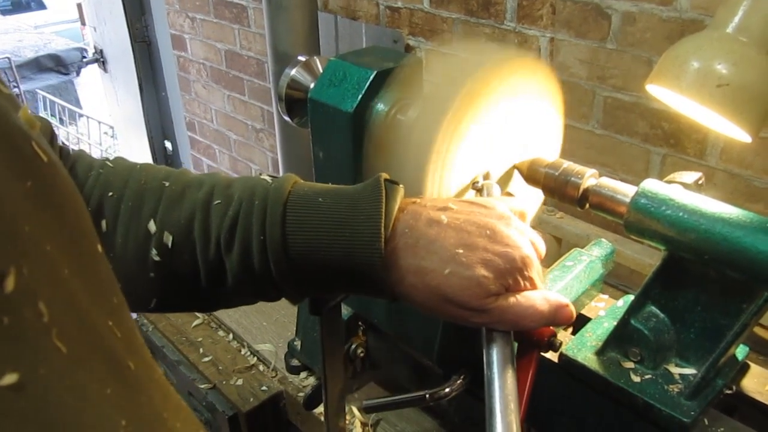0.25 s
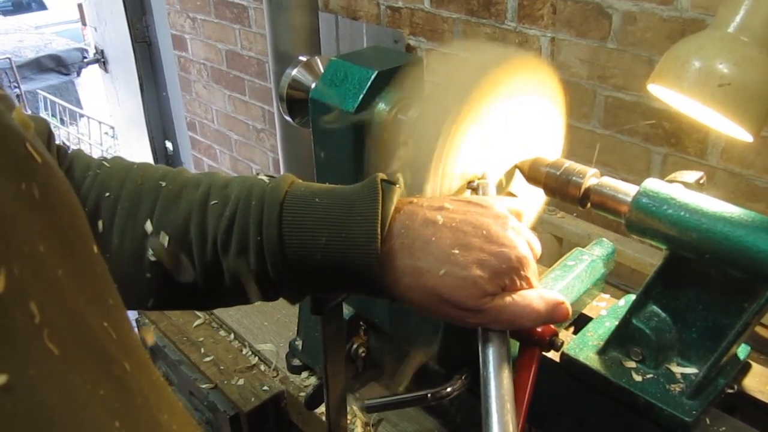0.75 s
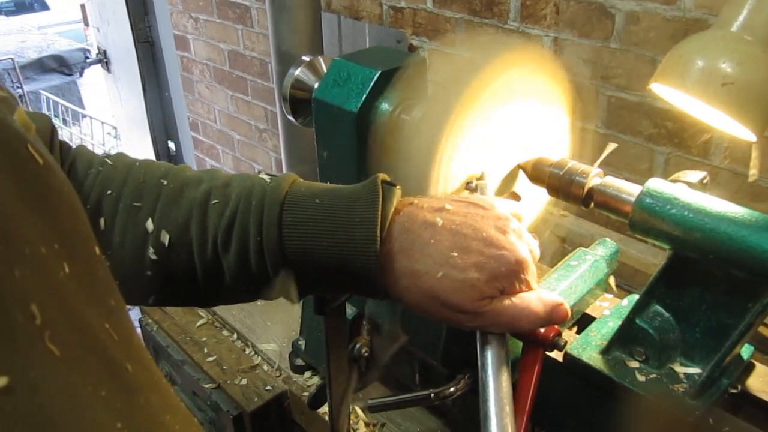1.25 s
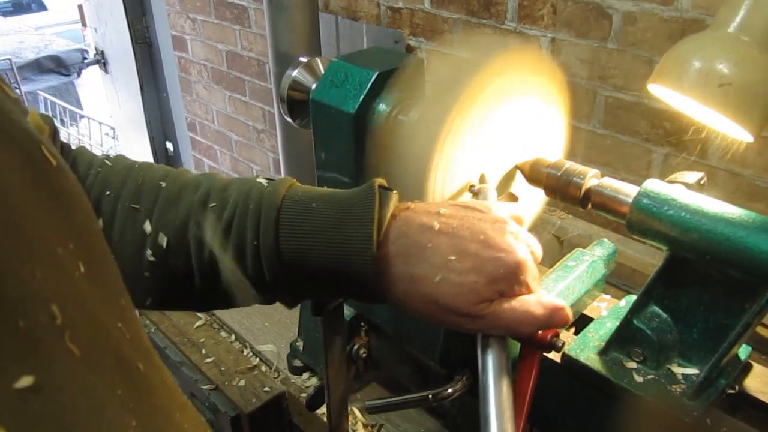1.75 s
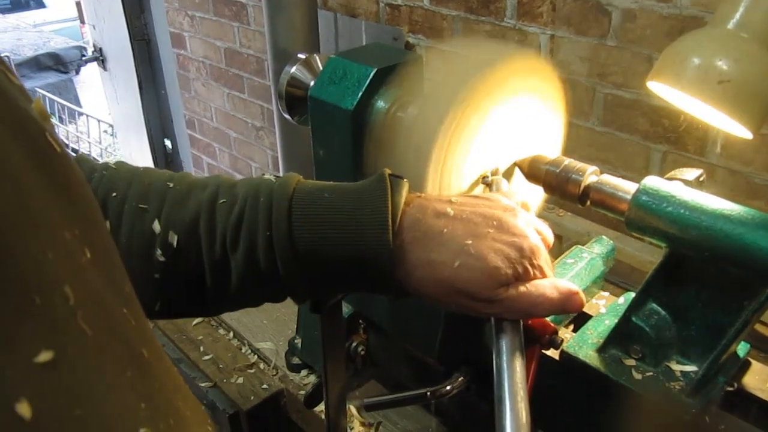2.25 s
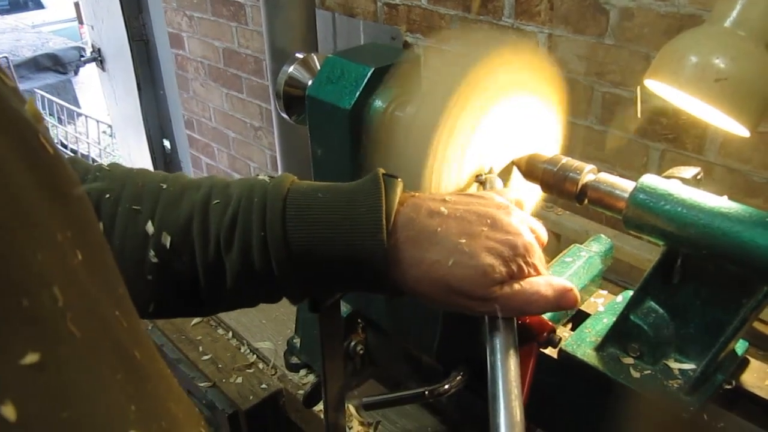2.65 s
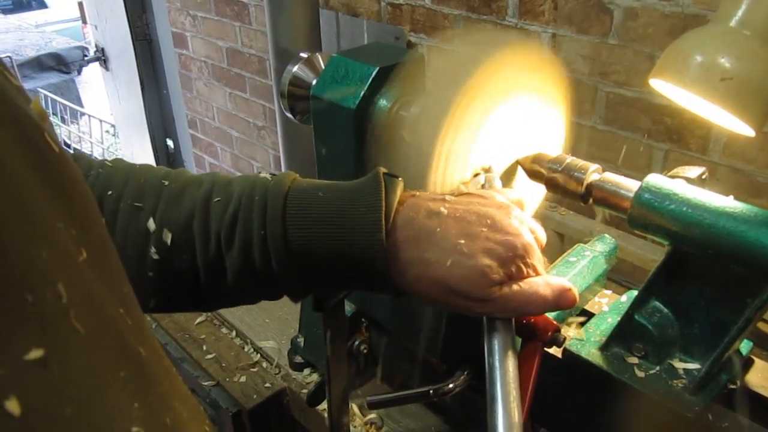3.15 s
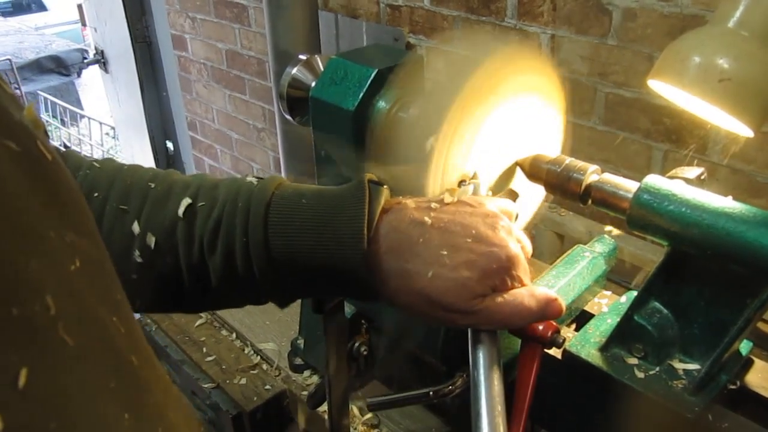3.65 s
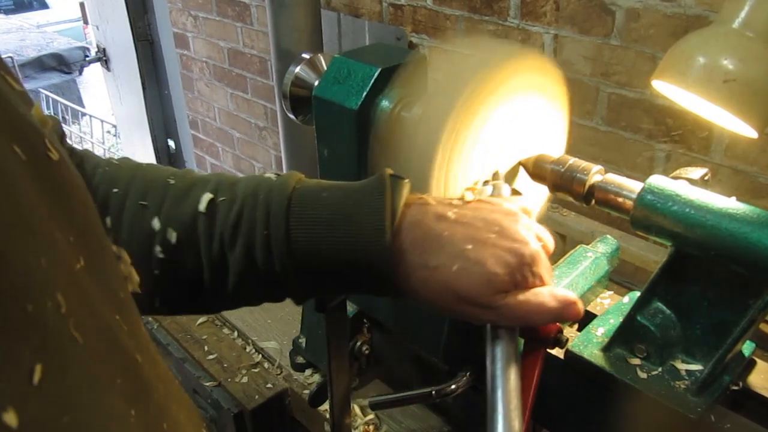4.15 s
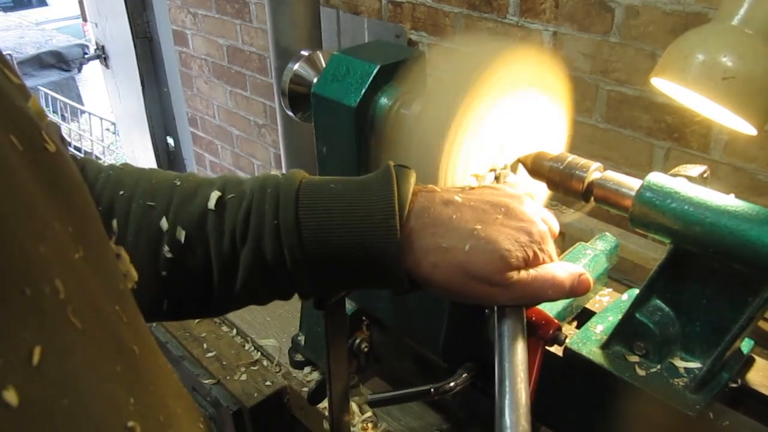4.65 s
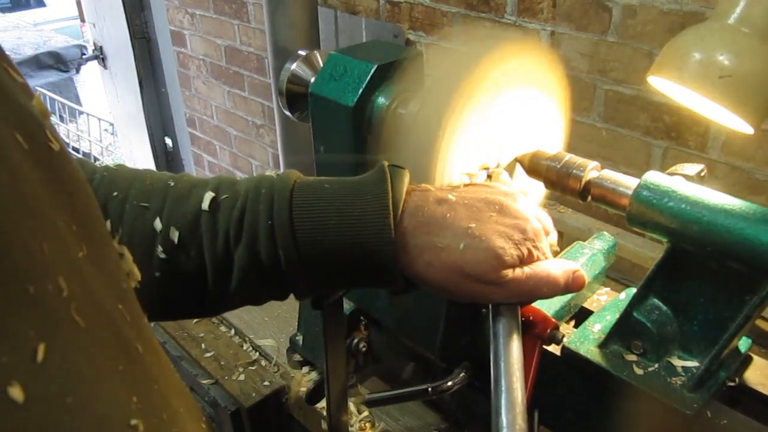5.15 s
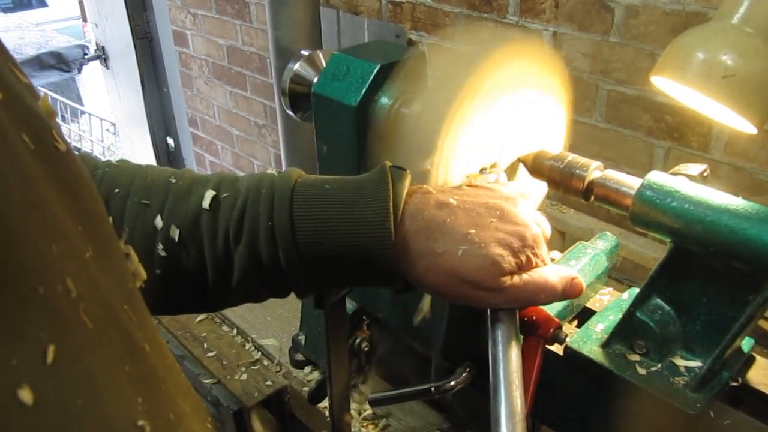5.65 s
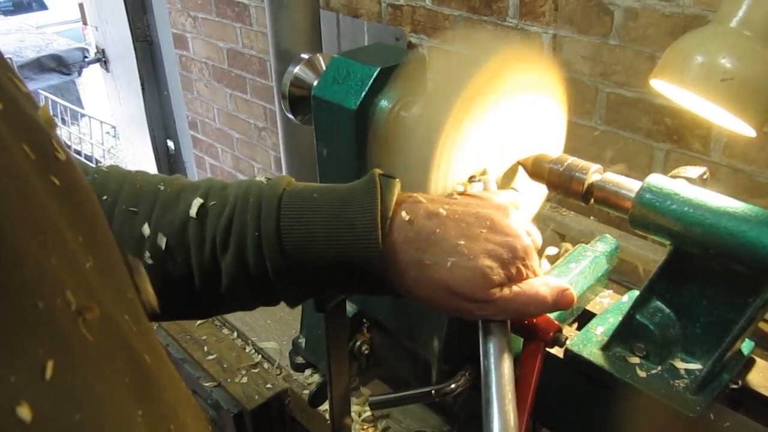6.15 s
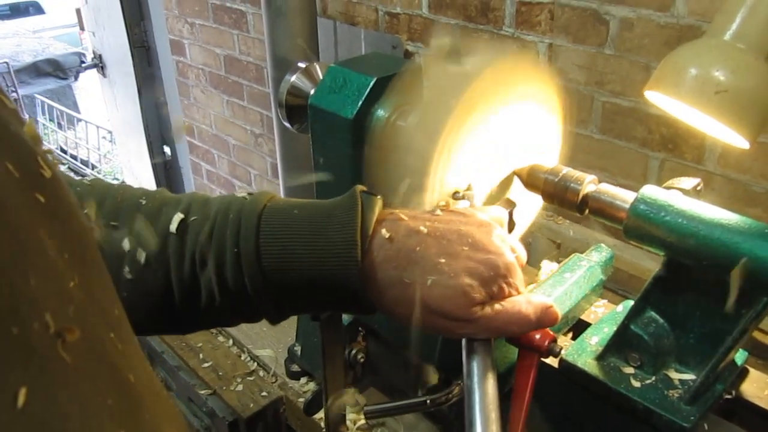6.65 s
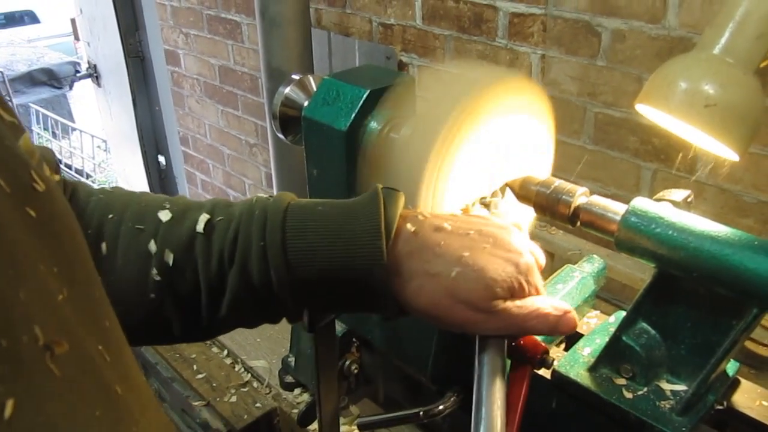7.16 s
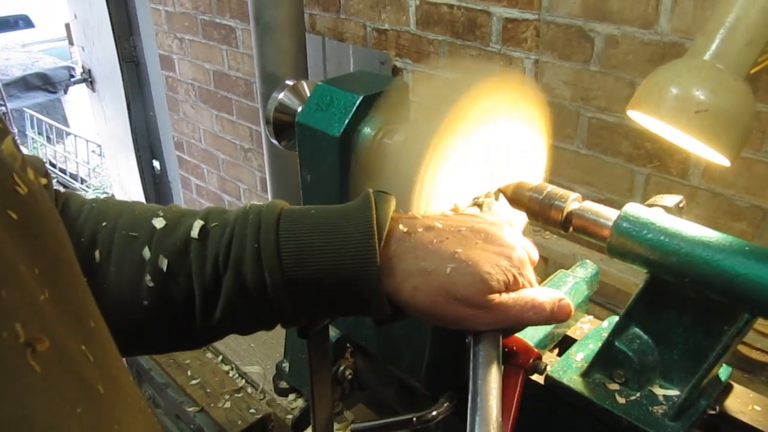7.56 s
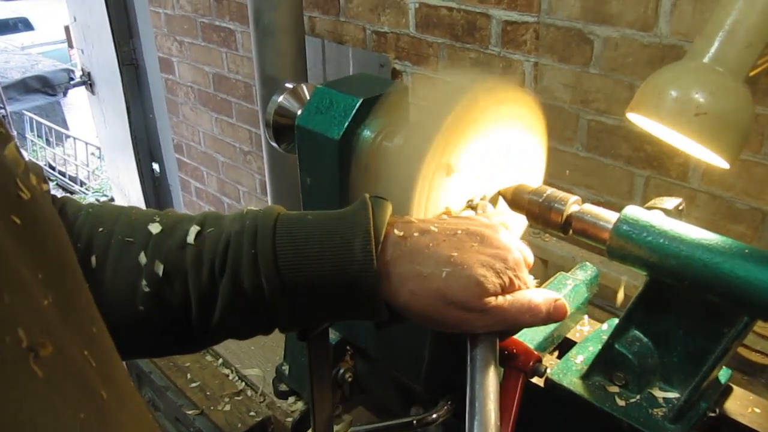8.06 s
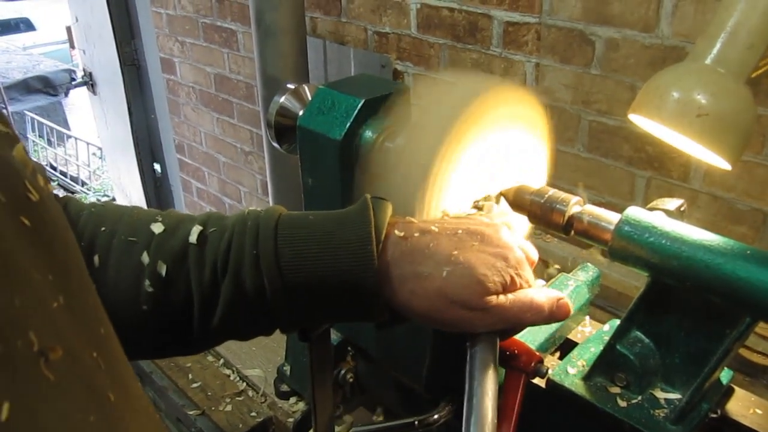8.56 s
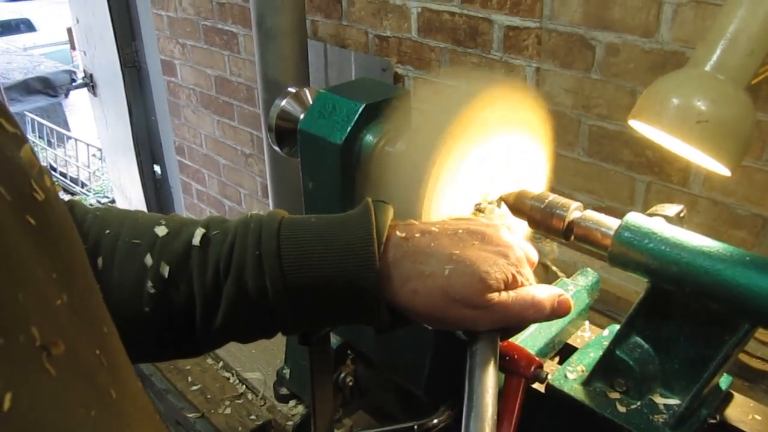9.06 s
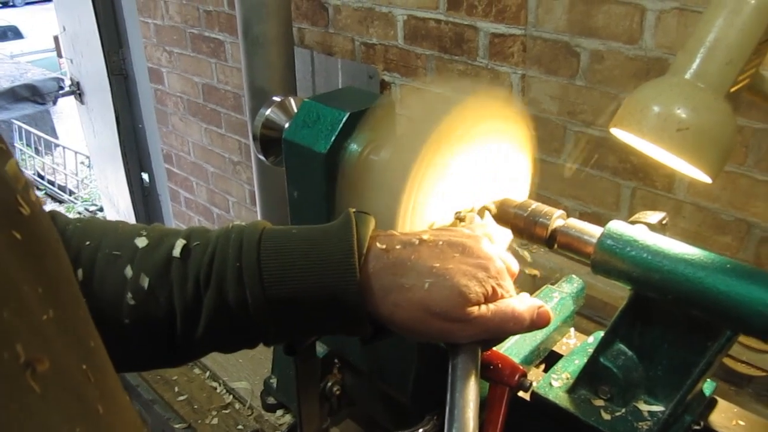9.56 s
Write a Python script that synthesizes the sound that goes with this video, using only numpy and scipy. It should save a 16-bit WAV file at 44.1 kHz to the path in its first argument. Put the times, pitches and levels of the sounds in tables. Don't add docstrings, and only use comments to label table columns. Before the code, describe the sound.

In a small brick workshop, a lathe motor hums low with a thin, pulsing belt hiss. A steel gouge bites a spinning wet bowl blank in bright, tearing hisses that flutter about thirty times a second. Five cuts come with short pauses, each starting with ticking touches and swelling to full rasp. A small nearby camera microphone gives a close, slightly dull-topped sound with short room echo.

```python
import sys
import numpy as np
from scipy import signal
from scipy.fft import rfft, irfft, next_fast_len
from scipy.io import wavfile
from scipy.ndimage import uniform_filter1d, map_coordinates

SR = 44100
rng = np.random.default_rng(int(sys.argv[2]) if len(sys.argv) > 2 else 0)


def undo_db(level):
    steps = np.asarray(level, float) / 20
    return 10 ** steps


def inscribe(sig):
    pcm = np.round(np.clip(np.atleast_2d(sig).T, -1, 1) * 32767)
    wavfile.write(sys.argv[1], SR, pcm.astype(np.int16))


N = 432180
TIME = np.arange(N) / SR
TURNS_A_SECOND = 16.2

# t/s, motor level/dB, belt level/dB
MACHINE = [
    (0, -37.5, -43),
    (1.8, -43, -44.5),
    (2.2, -41, -43.5),
    (4, -40.5, -41),
    (4.5, -38.5, -41),
    (7, -40.5, -41.5),
    (7.5, -38, -39),
    (8.5, -36, -38),
    (9.8, -35.5, -35),
]
# t/s, laps run
BELT_LAPS = [(-.06, -9), (1.81, 0), (2.02, 1), (4.09, 11), (4.5, 13), (7.015, 25), (7.425, 27), (8.455, 32),
             (8.87, 34), (9.91, 39)]
# f/Hz, width/Hz, level/dB
CASING_MODES = [(207.1, 3.3, 5), (428, 2, -5), (663.3, 15.6, -2), (907.7, 11.5, 3.5), (1400, 186, -9.5),
                (2290, 23, -1.5)]
PULLEY_MODES = [(5720, 140, -4), (6150, 100, 2), (7210, 180, 1.5), (9100, 84, -12), (9260, 400, 0.5),
                (10000, 130, 3.5)]
# f/Hz, level/dB (per Hz)
MOTOR_SPECTRUM = [(15, -7), (32, -4), (75, -29), (102, -7.5), (150, -12.5), (400, -10), (950, -8.5),
                  (1180, -18), (2000, -10.5), (3700, -18), (6000, -20.5), (15000, -32.5)]
BELT_AIR_SPECTRUM = [(3000, -31.5), (5000, -8.5), (6800, -5), (7200, 4), (10300, -2.5), (12500, -7),
                     (14000, -10), (16000, -30)]

# t/s, lead over an even spin/turns
SPIN_LEAD = [(.1, .75), (.53, .76), (.97, .705), (1.4, .64), (1.62, .56), (2.2, .97), (2.76, .965),
             (3.05, .9), (3.63, .945), (3.85, .89), (5.2, 1.36), (6.08, 1.46), (6.56, 1.4), (6.8, 1.27),
             (7.75, 1.75), (8.35, 1.806), (8.95, 2.175), (9.75, 2.29)]
# t/s, worst out-of-round level/dB, end grain level once deep/dB, shank ring once deep/dB
ENTRIES = [
    (-.05, 4, 5, 1),
    (2.1, 4, 5, -2),
    (4.62, 4.5, 4.5, -3),
    (7.55, 4.5, 5, 3),
    (8.699, 5, 6, 1),
]
# t/s, peak level/dB
CATCHES = [(0.103, 11), (0.2635, -5), (0.324, -1), (0.382, 3.5), (0.506, -3), (0.691, 0), (0.817, 0),
           (0.847, 2), (0.9428, -1), (1.128, 5), (1.2532, 0), (1.378, 1), (1.441, -3.5), (1.505, -2),
           (1.5688, -9), (2.6557, -5), (3.093, -2), (3.1507, -8), (3.3358, -7), (3.642, 6), (3.674, 2.5),
           (3.837, -1.5), (4.9154, 2), (5.282, 1), (6.58, -2), (6.7072, 5), (7.7964, 1), (8.0373, -3),
           (9.6395, -11), (9.7607, 2),
           (0.1431, 0), (0.166, -7), (1.601, -1), (1.886, -8), (2.066, -5), (2.1253, -1), (2.184, -14),
           (2.246, -8), (2.31, -7), (2.372, -8), (4.0657, -17), (4.5694, -13), (4.6294, -23), (4.6924, -4),
           (7.564, -7), (8.2806, 0), (8.3414, -28), (8.6018, -4), (8.902, -6), (8.9694, -12), (9.335, -1),
           (9.6719, -5)]

# t/s, pressure level/dB, shear (0 scraping, 1 slicing), reach (0 low, 1 high on the wall)
FIRST_CUT = [
    (0, -32.5, 0.9, 0.2),
    (.07, -26, 0.55, 0.36),
    (.3, -24, 0.65, 0.14),
    (.5, -21.5, 0.63, 0.68),
    (.82, -22, 0.73, 0.28),
    (.92, -27.5, .9, 0.85),
    (1.1, -24, 0.8, 0.48),
    (1.35, -26.5, 1, 0.92),
    (1.63, -23.5, 0.63, 0.8),
]
BRUSH = [
    (1.71, -48, 0.81, .1),
    (1.82, -57, .7, .5),
    (1.89, -30, 0.48, .3),
    (1.96, -54, 1, .3),
]
SECOND_CUT = [
    (2.1, -36, 0.43, .5),
    (2.2, -39.5, 0.69, 0.51),
    (2.5, -25.5, 0.42, .3),
    (2.7, -22.5, 0.47, 0),
    (2.95, -21, 0.43, 0),
    (3.1, -24, 0.51, 0.52),
    (3.3, -24.5, 0.57, 0.63),
    (3.5, -23, 0.54, 0.73),
    (3.59, -26.5, 0.6, 0.75),
]
RETAKE = [
    (3.62, -42, 1, .4),
    (3.65, -20.5, 0.71, 0.45),
    (3.75, -23.5, 0.58, 0.66),
    (3.86, -25.5, 0.94, 0.67),
    (3.92, -35, 0.48, 0.38),
    (4.05, -49, .7, .5),
    (4.45, -46, 1, .3),
]
THIRD_CUT = [
    (4.6, -35, .6, 0.24),
    (4.9, -22, 0.29, 0.35),
    (5.0, -26.5, 0.54, 0.15),
    (5.18, -21, 0.17, 0.27),
    (5.25, -29, 0.52, 0),
    (5.3, -21, 0.14, .1),
    (5.42, -25, 0.46, 0.53),
    (5.9, -22.5, 0.42, 0.34),
    (6.05, -22, 0.56, 0.74),
             (6.4, -22, 0.5, 0.66),
    (6.6, -21.5, 0.66, 0.76),
    (6.81, -23, 0.69, 0.59),
    (6.88, -39.5, .9, .3),
    (7.0, -50, 0.8, .6),
]
FOURTH_CUT = [
    (7.4, -50, 0.63, .6),
    (7.6, -37, .1, 0.5),
    (7.75, -29.5, 0.13, 0.12),
    (8.0, -23.5, .1, 0.48),
    (8.15, -30.5, 0.23, 0.57),
    (8.36, -24.5, 0.16, 0.35),
    (8.42, -45, .5, .5),
    (8.6, -40, 0.41, .4),
    (8.8, -39.5, 0.47, .9),
]
FIFTH_CUT = [
    (8.9, -30.5, 0.17, 0.22),
    (9.1, -24, 0.27, .6),
    (9.3, -26, 0.16, 0.22),
    (9.5, -27.5, 0.31, 0.28),
    (9.6, -24, 0.042, .3),
    (9.8, -27.5, .05, .2),
]
# t/s, bed level/dB
REST_WEIGHT = [(0.0, -52), (0.02, -46.5), (1.09, -39.5), (1.63, -44), (1.72, -54), (2.7, -40),
               (3.66, -51.5), (3.68, -42.5), (4.39, -57.5), (4.75, -39), (5.92, -48), (6.61, -43),
               (6.88, -54), (7.91, -40), (8.49, -47.5), (9.06, -37), (9.36, -46), (9.8, -39.5)]

# f/Hz, width/Hz, level/dB
TIP_SCRAPING = [(1960, 220, -4), (2890, 380, 1.5), (2917, 150, 2.5), (3030, 360, 6)]
TIP_SLICING = [(1880, 360, -12), (2960, 250, 5.5), (3226, 190, -1), (3750, 220, 2)]
SHANK_SCRAPING = [(4745, 50, 2), (4885, 80, -5), (5430, 120, -16)]
SHANK_SLICING = [(4760, 180, 5), (4940, 240, -7), (4100, 1050, -11)]
SHAVING_SCRAPING = [(3660, 390, -8), (6480, 300, 3), (8200, 230, -25), (9330, 270, -8), (10880, 120, -1.5),
                    (11750, 190, -7), (14600, 2200, -19)]
SHAVING_SLICING = [(3680, 300, -7), (6600, 280, -3), (7120, 150, -8), (7860, 300, -6), (9200, 220, 0),
                   (9500, 220, 0), (10750, 140, -2), (11850, 220, -8), (13100, 130, -11)]
WALL_MODES = [(2065, 210, 0)]
BED_MODES = [(196, 28, 3), (258, 30, -4), (316, 28, .5)]
# f/Hz, level/dB (per Hz)
TEARING_SPECTRUM = [(300, -42), (1000, -9.5), (1700, -23), (2600, -25), (4300, -0.5), (6000, -27)]
SHAVING_SPECTRUM = [(4500, -23.5), (6000, -9), (10300, -2), (11300, -15), (13300, -9), (16000, -32)]
TIP_DB, SHAVING_DB, SHANK_DB, BED_DB = (1.5, -14.5), (-4, 1), (-4, -6), (2, -2.5)
WALL_DB = (-26.5, -4)

# f/Hz, t60/s
SHOP_DECAY = [(200, 0.063), (2000, 0.21), (10000, 0.061)]
# f/Hz, level/dB
TREBLE_FALL = [(11000, 0.5), (13100, -6), (13800, -14), (15700, -15)]
THINNED = [.055, .566, .779, 1.12, 1.631, 1.952, 2.527, 2.68, 2.699, 2.846, 2.91, 3.573, 3.743, 3.812,
           4.001, 4.407, 4.962, 5.043, 5.195, 5.259, 6.303, 6.497, 6.86, 7.242, 7.477, 8.458, 8.565, 8.67,
           8.8, 8.908]
THINNED_TWICE = [2.69, 2.7]


def unit(x):
    return x / np.sqrt(np.mean(x ** 2) + 1e-20)


def along(points, hz):
    f, v = np.transpose(points)
    return np.interp(np.log(hz + 1), np.log(f + 1), v)


def curves(rows):
    s, *columns = np.transpose(rows)
    return [np.interp(TIME, s, column) for column in columns]


def between(ends, share):
    return ends[0] + (ends[1] - ends[0]) * share


def wobble(rate):
    return map_coordinates(rng.standard_normal(int(N * rate / SR) + 4), [TIME * rate])


def through(x, modes, spectrum=None, low_hz=20):
    m = next_fast_len(N + SR // 2)
    f = np.fft.rfftfreq(m, 1 / SR)
    ring = sum(undo_db(db) * 1j * f * w / (c * c - f * f + 1j * f * w) for c, w, db in modes)
    broad = undo_db(along(spectrum, f)) if spectrum else 0
    high_pass = (f / (f - 1j * low_hz)) ** 2
    return unit(irfft(rfft(x, m) * (ring + broad) * high_pass, m)[:N])


def fibres(spiky_db):
    return rng.standard_normal(N) * undo_db(spiky_db * wobble(900))


def patchy(x, depth_db):
    z = signal.stft(x, nperseg=256)[2]
    field = uniform_filter1d(rng.standard_normal(z.shape), size=4, axis=0)
    field = uniform_filter1d(field, size=5, axis=1)
    return signal.istft(z * undo_db(depth_db * unit(field)), nperseg=256)[1][:N]


def motor():
    level_db = curves(MACHINE)[0] + 0.27 * wobble(5.0)
    hum = through(rng.standard_normal(N), CASING_MODES, MOTOR_SPECTRUM) * undo_db(level_db)
    return patchy(hum, depth_db=1.0)


def belt():
    lap = curves(BELT_LAPS)[0] % 1
    joint = np.exp(-np.minimum(lap / .04, (1 - lap) / .1) ** 2)
    half_way = np.exp(-((lap - .52) / .05) ** 2)
    level_db = curves(MACHINE)[1] + 3.5 - 11 * joint - 4 * half_way + wobble(30)
    hiss = through(fibres(spiky_db=0.0), PULLEY_MODES, BELT_AIR_SPECTRUM) * undo_db(level_db)
    return patchy(hiss, depth_db=3.5)


def blank():
    truing_s, deepen_s = 0.22, 0.27
    s, round_db, grain_db, ring_db = np.transpose(ENTRIES)
    last = np.searchsorted(s, TIME) - 1
    age = TIME - s[last]
    high_side = age / truing_s * np.exp(1 - age / truing_s)
    deep = 1 - np.exp(-age / deepen_s)
    return round_db[last] * high_side, grain_db[last] * deep, ring_db[last] * deep


def jolts(press_db):
    s, peak_db = np.transpose(CATCHES)
    at = np.round((s + 0.0032) * SR).astype(int)
    impulses = np.zeros(N)
    impulses[at] = undo_db(peak_db - 8.5 - press_db[at]) ** 2
    t = np.linspace(-.02, .02, 1765)
    return np.abs(signal.fftconvolve(impulses, np.exp(-np.abs(t) / .0022), "same"))


def grain_load(press_db):
    round_db, grain_db, _ = blank()
    turns = TURNS_A_SECOND * TIME + curves(SPIN_LEAD)[0]
    angle = 2 * np.pi * turns
    strength = 1 + .12 * rng.standard_normal(400)[np.round(2 * turns).astype(int)]
    end_grain = np.exp(1.13 * (np.cos(2 * angle) - 1))
    load_db = 2.66 * grain_db * strength * end_grain
    load_db = load_db + 1.53 * round_db * np.cos(angle - 1.76) + 1.1 * wobble(60)
    load_db = load_db + 1.1 * round_db * (.5 - (turns + .03) % 1)
    power = undo_db(load_db) ** 2 + jolts(press_db)
    turn = round(SR / TURNS_A_SECOND)
    mean = uniform_filter1d(uniform_filter1d(power, size=turn), size=turn)
    return 10 * np.log10(power / mean)


def tear(load_db, share):
    return fibres(spiky_db=2.5) * undo_db(share * load_db)


def steady(x):
    power = uniform_filter1d(uniform_filter1d(x ** 2, size=SR // 4), size=SR // 4)
    return x / np.sqrt(np.abs(power) + 1e-9)


def roll(x, shear, scraping, slicing, **rest):
    rolled = np.clip(1.86 * shear - .3, 0, 1)
    return steady((1 - rolled) * through(x, scraping, **rest) + rolled * through(x, slicing, **rest))


def gouge_tip(load_db, shear):
    ring = roll(tear(load_db, 1.37), shear, TIP_SCRAPING, TIP_SLICING, spectrum=TEARING_SPECTRUM)
    return undo_db(between(TIP_DB, shear)) * ring


def gouge_shank(load_db, shear):
    ring = roll(tear(load_db, 0.96), shear, SHANK_SCRAPING, SHANK_SLICING, low_hz=2450)
    return undo_db(between(SHANK_DB, shear) + blank()[2]) * ring


def shaving(load_db, shear, press_db):
    curl_db = uniform_filter1d(load_db, size=180, origin=-40)
    contact = np.clip((press_db + 44) / 7, .05, 1)
    hiss = roll(tear(curl_db, 1.25), shear, SHAVING_SCRAPING, SHAVING_SLICING, spectrum=SHAVING_SPECTRUM)
    return contact * undo_db(between(SHAVING_DB, shear)) * hiss


def bowl_wall(load_db, reach):
    ring = through(through(tear(load_db, 0.78), WALL_MODES), WALL_MODES)
    return undo_db(between(WALL_DB, reach)) * steady(ring)


def lathe_bed(load_db, shear, press_db):
    ring = through(through(tear(load_db, 0.18), BED_MODES), BED_MODES, low_hz=121)
    shake_db = 0.18 * (press_db + 23.5) + curves(REST_WEIGHT)[0] + 1.9 * wobble(6)
    return undo_db(between(BED_DB, shear) + shake_db) * steady(ring)


def cutting():
    passes = FIRST_CUT + BRUSH + SECOND_CUT + RETAKE + THIRD_CUT + FOURTH_CUT + FIFTH_CUT
    press_db, shear, reach = curves(passes)
    load_db = grain_load(press_db)
    chips = gouge_tip(load_db, shear) + gouge_shank(load_db, shear) + shaving(load_db, shear, press_db)
    chips = patchy(chips, depth_db=2.5)
    wood = chips + bowl_wall(load_db, reach)
    return undo_db(press_db - 1.74) * wood + lathe_bed(load_db, shear, press_db)


def shop(x):
    hz, t, z = signal.stft(rng.standard_normal(SR // 2), SR, nperseg=256)
    decay = undo_db(-60 * t / along(SHOP_DECAY, hz)[:, None])
    tail = signal.istft(z * decay, SR, nperseg=256)[1]
    late = np.pad(x, (300, 0))
    return signal.fftconvolve(late, tail / np.linalg.norm(tail))[:N]


def scene():
    machine = motor() + belt()
    cut = cutting()
    return (cut + undo_db(-7.0) * shop(cut) + machine)[None]


def treble_end(x):
    m = next_fast_len(N)
    hz = np.fft.rfftfreq(m, 1 / SR)
    response = undo_db(along(TREBLE_FALL, hz)) * (hz < 15750)
    return irfft(rfft(x, m) * response, m)[:N]


def thin_out(x, moments, keep_db):
    size = 1600
    block = np.round(np.array(moments) * SR).astype(int)[:, None] + np.arange(size) - size // 2
    lines = rfft(x[block] * np.hanning(size))
    power = uniform_filter1d(np.abs(lines) ** 2, size=3, axis=1)
    band = np.abs(uniform_filter1d(power, size=80, axis=1))
    threshold = np.sqrt(band * power.mean(axis=1, keepdims=True))
    above_bass = np.fft.rfftfreq(size, 1 / SR) > 450
    weak = (power < undo_db(keep_db) ** 2 * threshold) & above_bass
    lost = .85 * irfft(lines * weak, size)
    return x - np.bincount(block.ravel(), lost.ravel(), N)


def band_limit(x):
    return signal.sosfilt(signal.butter(12, 15710, fs=SR, output="sos"), x)


def record(dry):
    heard = treble_end(dry[0])
    thinned = thin_out(heard, THINNED, keep_db=2)
    mix = thin_out(thinned, THINNED_TWICE, keep_db=0)
    return band_limit(mix[None])


dry = scene()
out = record(dry)
inscribe(out)
```